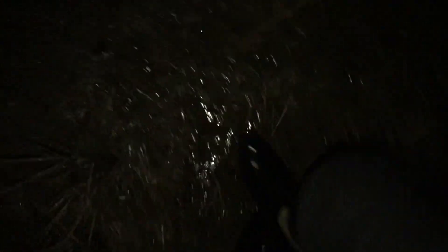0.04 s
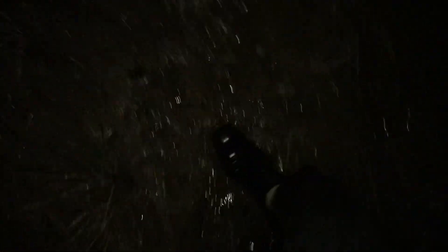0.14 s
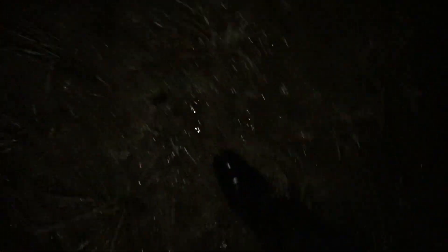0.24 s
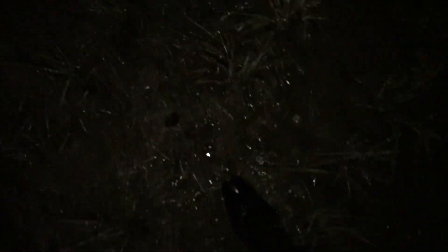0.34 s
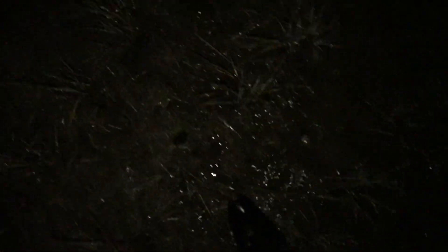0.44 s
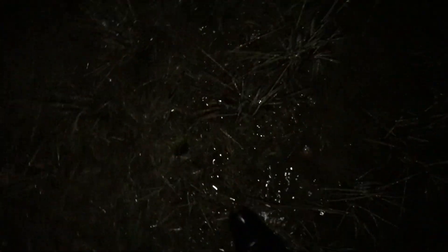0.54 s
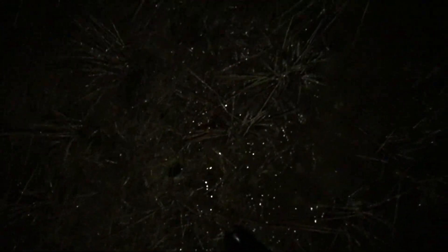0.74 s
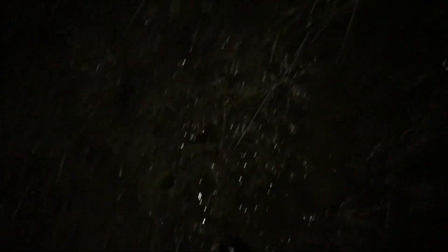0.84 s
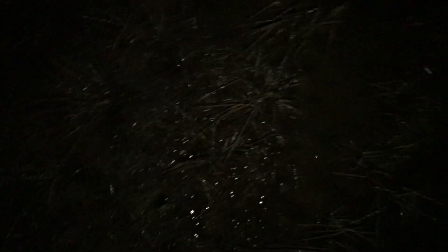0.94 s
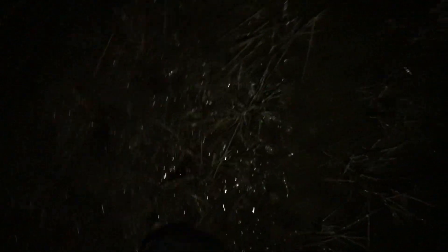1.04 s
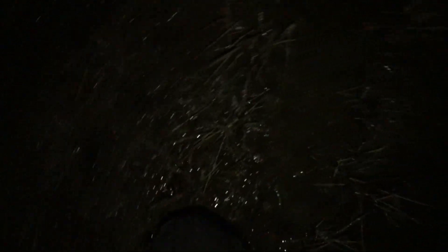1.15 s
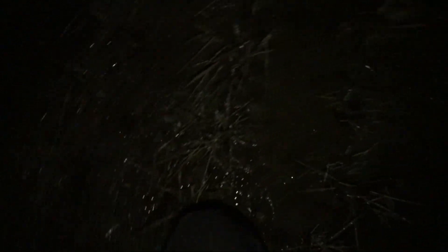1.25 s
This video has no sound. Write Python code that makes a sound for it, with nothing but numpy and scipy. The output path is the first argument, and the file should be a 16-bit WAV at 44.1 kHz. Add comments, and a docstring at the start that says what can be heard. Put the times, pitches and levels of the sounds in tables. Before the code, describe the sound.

One short, wet squelch sounds near the microphone as a foot presses into soaked turf outside. Small ticks lead into bubbly pops and a fine fizz, then the ground keeps ticking faintly against a low-level background hiss.

```python
"""One step on waterlogged grass at night, over a quiet steady hiss. First the sole thuds softly on the
ground and small pockets tick open in the wet turf. At 0.21 s trapped air and water break out of the mud:
cavities pop in a quick run, each a damped resonator throwing a fine spray, and bubbles ring.
The squelch dies into a gurgle. Afterwards the turf keeps ticking and seeping as the weight shifts."""
import sys
import numpy as np
from scipy import signal
from scipy.fft import rfft, irfft
from scipy.io import wavfile

SR = 44100
rng = np.random.default_rng(int(sys.argv[2]) if len(sys.argv) > 2 else 0)


def inscribe(sig):
    """Save sig as 16-bit PCM at rate SR to the path in sys.argv[1].

    A 1-D sig is mono; a 2-D sig holds one channel per row.
    Samples are clipped to [-1, 1] before scaling.
    """
    pcm = np.round(np.clip(np.atleast_2d(sig).T, -1, 1) * 32767)
    wavfile.write(sys.argv[1], SR, pcm.astype(np.int16))


N = 57330

# Spectrum of fine spray and froth. Each row: frequency in Hz, relative level in dB.
SPRAY_SPECTRUM = [(1500, -26.5), (3500, -6), (5200, -15.5), (6800, -2), (8100, -1), (9400, -2),
                  (10200, -10.5), (11300, -1), (12500, -6), (16000, -8.5)]


def undb(db):
    """Decibels to amplitude ratio."""
    return 10 ** (np.asarray(db) / 20)


def unit(x):
    """Normalisation to rms 1."""
    return x / np.sqrt(np.mean(x ** 2) + 1e-20)


def colour(x, spectrum):
    """Minimum-phase filtering through (Hz, dB) points, conserving the power of white noise."""
    hz, db = np.array(spectrum, float).T
    bin_hz = np.maximum(np.arange(2049) * SR / 4096, 1)
    gain = undb(np.interp(np.log(bin_hz), np.log(hz), db))
    cepstrum = irfft(np.log(gain))
    cepstrum[1:2048] *= 2  # folding the cepstrum makes the filter causal
    cepstrum[2049:] = 0
    response = irfft(np.exp(rfft(cepstrum)))
    return signal.fftconvolve(x, response / np.linalg.norm(response))[:len(x)]


def add(out, start_s, x):
    """Superposition of x on out from the given time."""
    i = int(np.clip(start_s * SR, 0, N - 1))
    out[i:i + len(x)] += x[:N - i]


def swell(u):
    """Critically damped envelope: a rise to 1 at u = 1, then an exponential fall."""
    return u * np.exp(1 - u)


def crackle(per_s, spread_db):
    """Shot noise: independent clicks of random size and sign, rms 1."""
    hit, size, sign = rng.random((3, N))
    return unit((hit < per_s / SR) * undb(spread_db * size) * np.sign(sign - .5))


def hiss():
    """Stationary filtered noise forms the background."""
    # Each row: frequency in Hz, relative spectral density in dB.
    spectrum = [(20, -20), (35, -9.5), (58, -1), (100, -4.5), (240, -3.5), (330, -3.5), (450, -7.5),
                (750, -5.5), (1200, -2), (2000, -3), (3100, -10.5), (4500, -12.5), (6500, -14.5),
                (8500, -16.5), (10500, -17), (12700, -12), (16000, -17)]
    return undb(-57.5) * unit(colour(rng.standard_normal(N), spectrum))


def thuds():
    """Heel and ball sink into soft ground, whose damping ends each low vibration within a few cycles."""
    # Each row: start in seconds, frequency in Hz, level in dB.
    presses = [(0.05, 48.13, -61), (0.111, 49.6, -62), (0.186, 50.47, -54), (0.293, 45.46, -52.5)]
    cycles_to_peak = 0.5335
    out, t = np.zeros(N), np.arange(SR // 2) / SR
    for start, hz, db in presses:
        add(out, start, undb(db) * swell(t * hz / cycles_to_peak) * np.sin(2 * np.pi * hz * t))
    return out


def seepage():
    """Water seeping through the turf makes faint shot noise, modulated as the weight shifts."""
    # Each row: time in seconds, level in dB.
    levels = [(0, -63.5), (.09, -65), (.125, -61), (.16, -62.5), (.3, -56.5), (.35, -57), (.42, -60.5),
              (.457, -55), (.51, -60.5), (.6, -65), (.75, -67.5), (1.3, -74.5)]
    # Each row: frequency in Hz, relative level in dB.
    spectrum = [(100, -12.5), (350, -5.5), (600, -8), (1500, -2.5), (3000, -1.5), (4500, -9.5), (8000, -15),
                (12000, -11.5), (16000, -15)]
    envelope = undb(np.interp(np.arange(N) / SR, *np.array(levels).T))
    return colour(envelope * crackle(per_s=1800, spread_db=25), spectrum)


def droplets():
    """Tiny droplets on wet grass blades sound at random times, each a damped sinusoid."""
    low_hz, high_hz, weakest_db, spread_db, peak_s = 2013, 15038, -62, 12, 0.0001936
    out, t = np.zeros(N), np.arange(SR // 100) / SR
    for when, pitch, size in rng.random((70, 3)):
        hz = low_hz + pitch * (high_hz - low_hz)
        envelope = undb(weakest_db + spread_db * size) * swell(t / peak_s)
        add(out, when * N / SR, envelope * np.sin(2 * np.pi * hz * t))
    return out


def pop(hz, cycles_to_peak, crack):
    """A heavily damped cavity resonance rises in pitch as it opens; its tearing film adds band noise."""
    glide, band_ratio = 0.0279, 1.6785  # fractional pitch rise per decay time; band edge over centre
    t = np.arange(SR // 20) / SR
    u = t * hz / cycles_to_peak
    ring = np.sin(2 * np.pi * hz * t * (1 + glide * (np.minimum(u, 10) / 2 - 1)))
    edges_hz = [hz / band_ratio, min(hz * band_ratio, SR / 2 - 1000)]
    band = signal.butter(2, edges_hz, "band", fs=SR, output="sos")
    tear = unit(signal.sosfilt(band, rng.standard_normal(len(t))))[::-1]
    sine_rms = np.sqrt(np.mean(swell(u) ** 2) / 2)
    return sine_rms * unit(swell(u) * (ring + crack * tear))


def radiate(x, order, cutoff_hz):
    """Small sources radiate low frequencies poorly, which acts as a high-pass filter."""
    return signal.sosfilt(signal.butter(order, cutoff_hz, "high", fs=SR, output="sos"), x)


def ticks():
    """Small pockets open in the turf before and after the squelch, each a brief cavity resonance."""
    # Each row: start in seconds, frequency in Hz, level in dB before radiation.
    pockets = [(0.1005, 2240, -39), (0.1198, 1423, -33.5), (0.1379, 1393, -44.5), (0.1737, 3274, -38),
               (0.1936, 1349, -44.5), (0.303, 1987, -32.5), (0.3491, 1796, -45.5), (0.3532, 2412, -44),
               (0.449, 2861, -36.5), (0.4697, 1080, -44), (0.4742, 3934, -36), (0.4738, 11320, -41.5),
               (0.4903, 1201, -36), (0.4948, 1282, -42), (0.5545, 1971, -40), (0.5690, 12450, -44),
               (0.6391, 2699, -45.5), (0.7476, 2010, -46.5), (0.8128, 800.1, -42), (0.8136, 2400, -46),
               (0.8640, 7929, -50), (1.1500, 873.6, -44), (1.1860, 2077, -39), (1.1870, 1002, -42)]
    peak_s = 0.00034306
    out = np.zeros(N)
    for start, hz, db in pockets:
        add(out, start, undb(db) * pop(hz, hz * peak_s, crack=0.5783))
    return radiate(out, order=4, cutoff_hz=476)


def flow(attack_s, hold_s, decay_s):
    """Water flow under the sole rises linearly, holds, then relaxes exponentially."""
    onset_s = .2118
    t = np.arange(N) / SR - onset_s
    return np.clip(t / attack_s, 0, 1) * np.exp(-np.maximum(t - hold_s, 0) / decay_s)


def squeeze():
    """Flow modulates shot noise: froth fizzes out, the gurgle lasts longer, mud gives way underneath."""
    # Spectra of the gurgle and the yielding mud. Each row: frequency in Hz, relative level in dB.
    gurgle_spectrum = [(100, -28), (500, -23.5), (900, -13), (1400, -1.5), (2600, -0.5), (3500, -4.5),
                       (5000, -17), (9000, -27), (16000, -41)]
    mud_spectrum = [(40, -12), (90, -0.5), (150, -7), (230, 1.5), (400, -4.5), (700, -4.5), (1500, -21.5),
                    (6000, -51.5)]
    fizz = undb(-38) * flow(attack_s=0.00032, hold_s=0.02033, decay_s=0.007332)
    fizz += undb(-47) * flow(attack_s=0.004004, hold_s=0.05754, decay_s=0.011013)
    gurgle = undb(-44) * flow(attack_s=0.001195, hold_s=0.049733, decay_s=0.0188)
    mud = undb(-52.5) * flow(attack_s=0.002307, hold_s=0.018205, decay_s=0.01184)
    return (colour(fizz * crackle(per_s=4000, spread_db=21.5), SPRAY_SPECTRUM)
            + colour(gurgle * crackle(per_s=2500, spread_db=15.5), gurgle_spectrum)
            + colour(mud * crackle(per_s=3000, spread_db=8.5), mud_spectrum))


def bubbles():
    """Bubbles in the squeezed water ring as damped oscillators and glide upward in pitch."""
    # Each row: start in seconds, initial frequency in Hz, level in dB, seconds to decay by 60 dB.
    rings = [(0.2142, 3258, -21, 0.0001), (0.2285, 8065, -28, 0.0234), (0.2366, 2766, -33, 0.0162),
             (0.2560, 2553, -38, 0.011), (0.2644, 4369, -31.5, 0.0094), (0.2816, 2890, -45.5, 0.0258)]
    glide = 0.006147  # half the fractional pitch rise per decay time
    out, t = np.zeros(N), np.arange(SR // 10) / SR
    for start, hz, db, t60 in rings:
        u = np.log(1000) * t / t60
        envelope = undb(db) * np.exp(-u) * (1 - np.exp(-t * hz))
        add(out, start, envelope * np.sin(2 * np.pi * hz * t * (1 + glide * u)))
    return out


def bursts():
    """Air pockets burst under the sole: each excites a cavity resonance and a shot-noise puff of spray."""
    # Each row: start in seconds, frequency in Hz, pop level in dB before radiation, cycles to the peak,
    # relative spray level in dB.
    pockets = [(0.2141, 1797, -17, 0.60804, -20.5), (0.2202, 1992, -28, 0.792, -27),
               (0.2228, 1451, -29, 0.996, -35.5), (0.2243, 1323, -37.5, 1.212, -24.5),
               (0.2292, 3037, -33.5, 1.077, -24), (0.2335, 2513, -22, 2.0784, -36.5),
               (0.2477, 2553, -39.5, 1.672, -46.5), (0.253, 1433, -25, 0.499, -41),
               (0.2644, 2184, -39, 1.602, -34.5)]
    puff_peak_s = 0.0005799
    pops, puffs, t = np.zeros(N), np.zeros(N), np.arange(SR // 20) / SR
    for start, hz, pop_db, cycles_to_peak, spray_db in pockets:
        add(pops, start, undb(pop_db) * pop(hz, cycles_to_peak, crack=0.6305))
        add(puffs, start, undb(spray_db) * swell(t / puff_peak_s))
    spray = colour(puffs * crackle(per_s=16000, spread_db=12), SPRAY_SPECTRUM)
    return radiate(pops, order=2, cutoff_hz=846) + undb(-3.5) * spray


def scatter(x, db, decay_s):
    """Scattering from the ground and the legs adds weak, short reflections to the direct sound."""
    rise_s = 0.000633
    t = np.arange(SR // 5) / SR
    response = rng.standard_normal(len(t)) * np.exp(-t / decay_s) * (1 - np.exp(-t / rise_s))
    return x + undb(db) * signal.fftconvolve(x, response / np.linalg.norm(response))[:N]


def scene():
    """The wet sounds, their reflections, the thuds and the hiss superpose in one channel."""
    wet_sounds = bursts() + bubbles() + squeeze() + ticks() + droplets() + seepage()
    return (scatter(wet_sounds, db=-12.5, decay_s=0.008792) + thuds() + hiss())[None]


def record(dry):
    """An elliptic low-pass filter cuts the highest treble steeply."""
    cutoff_hz = 15750
    return signal.sosfilt(signal.ellip(10, .2, 80, cutoff_hz, fs=SR, output="sos"), dry)


dry = scene()
out = record(dry)
inscribe(out)
```